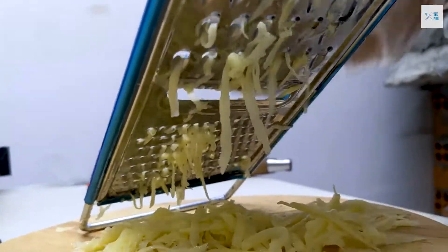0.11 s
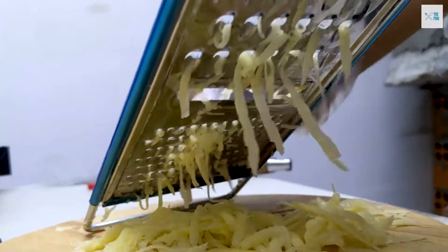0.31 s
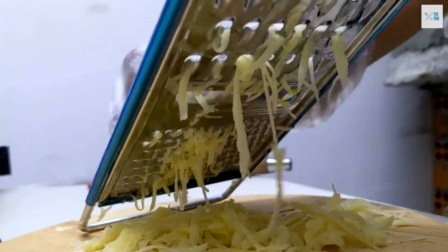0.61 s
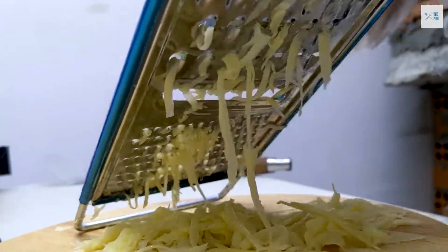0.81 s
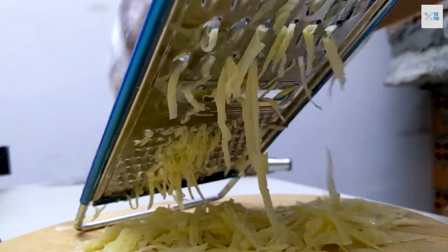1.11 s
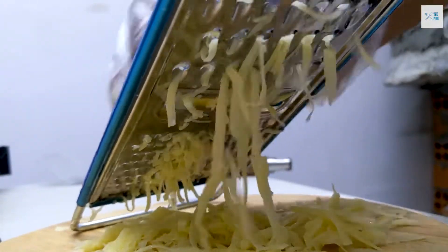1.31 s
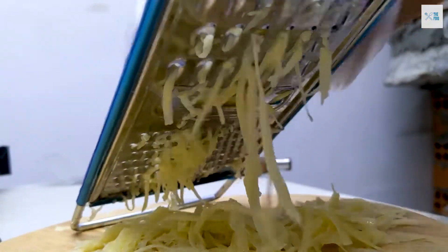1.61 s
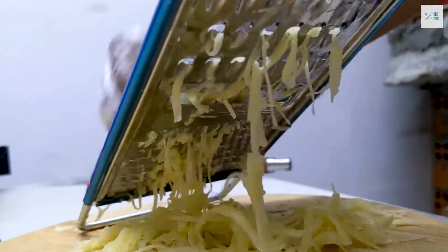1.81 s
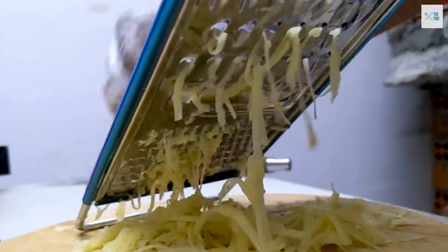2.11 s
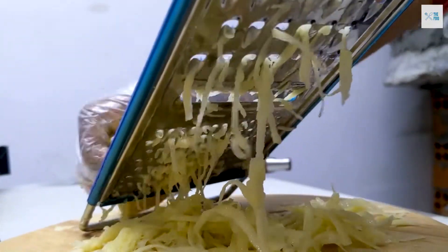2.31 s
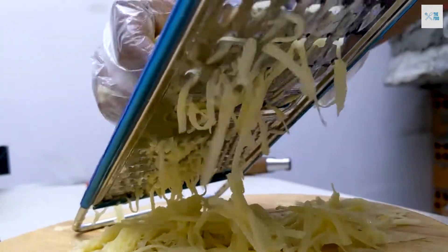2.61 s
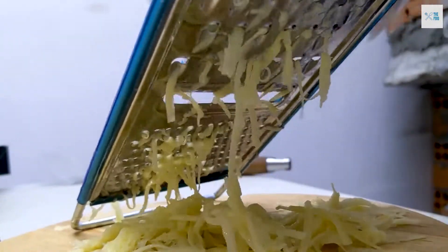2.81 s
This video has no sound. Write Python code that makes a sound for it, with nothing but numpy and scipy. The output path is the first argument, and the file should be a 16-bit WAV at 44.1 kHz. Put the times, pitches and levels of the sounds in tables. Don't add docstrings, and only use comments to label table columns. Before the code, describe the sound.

Raw potato grating, close in stereo in a quiet small kitchen. Faint scuff and steel rattle at 0 s, a steely drag at 0.2, a strong low board knock with rattle at 0.4. Wet, crunchy hissing strokes follow at about 0.6, 0.95, 1.3, 1.7 (loudest), 2.0, 2.3 and 2.6, shorter towards the end, with soft brushes between. Another heavy knock left at 2.13; light slides finish.

```python
import sys
import numpy as np
from scipy import signal
from scipy.fft import rfft, irfft, next_fast_len
from scipy.io import wavfile
from scipy.ndimage import uniform_filter1d, map_coordinates

SR = 44100
rng = np.random.default_rng(int(sys.argv[2]) if len(sys.argv) > 2 else 0)


def persist_wave(psi):
    counts = np.round(np.clip(psi, -1, 1) * 32767).astype(np.int16)
    wavfile.write(sys.argv[1], SR, np.atleast_2d(counts).T)


def amplitude_ratio(level_db):
    exponent = np.asarray(level_db, float) / 20
    return 10 ** exponent


N = 130095

# centre in Hz, width in Hz, level in dB.
STEEL_MODES = [(1630, 110, 3.5), (2180, 290, -3.5), (2852, 47, 6), (4080, 190, -17), (5240, 93, -5)]


def unit(x):
    return x / np.sqrt(np.mean(x ** 2) + 1e-20)


def along(points, hz):
    f, v = np.transpose(points)
    return np.interp(np.log(hz + 1), np.log(f + 1), v)


def shade(points):
    return lambda hz: amplitude_ratio(along(points, hz)) * (hz > points[0][0] / 2)


def peaks(modes, hz):
    total = 0
    for k, (centre, width, db) in enumerate(modes):
        damping = 1j * hz * width
        total = total + (-1) ** k * amplitude_ratio(db) * damping / (centre * centre - hz * hz + damping)
    return total


def wobble(rate):
    knots = rng.standard_normal(N // 40)
    return map_coordinates(knots, [np.arange(N) * np.clip(rate, 1, 1000) / SR])


def filtered(x, response):
    m = next_fast_len(N + SR // 2)
    return irfft(rfft(x, m) * response(np.fft.rfftfreq(m, 1 / SR)), m)[..., :N]


def rush(gain, patchy_db):
    # frequency in Hz, left-right correlation from 0 to 1.
    likeness = [(60, 0.43), (130, 0.98), (300, 0.96), (640, 0.71), (1400, 0.45), (3100, 0.065),
                (15000, .02)]
    z = signal.stft(rng.standard_normal((2, N)), nperseg=256)[2]
    field = uniform_filter1d(rng.standard_normal(z.shape[1:]), size=5, axis=0)
    field = uniform_filter1d(field, size=8, axis=1)
    pair = signal.istft(z * amplitude_ratio(patchy_db * unit(field)), nperseg=256)[1][:, :N]

    def mid_side(hz):
        turn = np.arccos(np.clip(along(likeness, hz), -1, 1)) / 2
        return gain(hz) * [np.cos(turn), np.sin(turn)]

    mid, side = filtered(pair, mid_side)
    return unit(np.array([mid + side, mid - side]))


def add(track, s, piece):
    i = max(round(s * SR), 0)
    track[i:i + len(piece)] += piece[:len(track) - i]


def floor():
    # frequency in Hz, level in dB per Hz.
    colour = [(30, -22), (90, -4.5), (180, -2), (600, -16.5), (1300, -24.5), (4000, -28.5), (15000, -35.5)]
    return amplitude_ratio(-45 + 3.4 * wobble(8.61)) * rush(shade(colour), patchy_db=-3.5)


def room(x):
    # frequency in Hz, time to fall 60 dB in seconds.
    decay = [(200, 0.11), (2000, 0.46), (12000, 0.043)]
    hz, t, z = signal.stft(rng.standard_normal((2, SR // 3)), SR, nperseg=256)
    tail = signal.istft(z * amplitude_ratio(-60 * t / along(decay, hz)[:, None]), SR, nperseg=256)[1]
    return signal.fftconvolve(x, tail / np.linalg.norm(tail[0]), axes=1)[:, :N]


def pressure(rows, bite, swell, fade, column=0, lag=0):
    t, out = np.arange(N) / SR, np.zeros(N)
    for row in rows:
        start, length, hiss_db = row[:3]
        layer_db = row[column] if column else 0
        u = np.maximum(t - start, 0)
        rise = (1 - np.exp(-u / bite)) * (1 - np.exp(-u / (swell + lag)))
        lifted = np.maximum(u - length - lag / 2, 0) / fade
        out += rise * amplitude_ratio(hiss_db + layer_db - 20 * lifted ** 1.21)
    return out


def contact(column=0, lag=0):
    # start in seconds, push length in seconds, hiss in dB,
    # body in dB over the hiss, steel in dB over the hiss.
    cuts = [
        (.608, 0.1, -25, -8.5, -11.5),
        (.958, .1, -24, -8, -14),
        (1.331, .15, -25.5, -11.5, -14),
        (1.698, 0.093, -22, -10.5, -14.5),
        (2.022, .08, -24.5, -6.5, -8.5),
        (2.323, 0.076, -24, -8, -9.5),
        (2.63, 0.051, -24.5, -10.5, -13.5),
    ]
    # start in seconds, length in seconds, hiss in dB,
    # body in dB over the hiss, steel in dB over the hiss.
    slides = [(0, 0.023, -45.5, 5.5, 6.5), (.095, 0.021, -54.5, -13, -3), (.39, 0.062, -60, 17.5, 7),
              (.515, 0.035, -48.5, 10, -1.5), (.73, 0.034, -44, 2, -2), (.822, .05, -36, -6.5, -14),
              (.88, 0.041, -40, -3, -6), (1.09, 0.052, -45, -5.5, -6), (1.15, 0.028, -49.5, -2, -8),
              (1.23, 0.027, -50, -7, -11), (1.266, 0.033, -43, -4.5, -10), (1.54, 0.056, -56.5, 5.5, 0),
              (1.9, 0.068, -57.5, 5, -14.5), (1.66, 0.026, -45, -0.5, -6.5), (1.85, 0.057, -56, -6, -6),
              (1.96, 0.025, -46, 6, -8), (2.15, 0.034, -51, 8.5, -11), (2.245, 0.024, -44.5, 4.5, -9.5),
              (2.47, 0.059, -51.5, 4, -1.5), (2.55, 0.037, -45, 5.5, -2.5), (2.795, 0.089, -49, -4.5, -5),
              (2.9, 0.066, -41, -2.5, -13)]
    # start in seconds, length in seconds, hiss in dB,
    # body in dB over the hiss, steel in dB over the hiss.
    catches = [
        (.066, .01, -48, -4, 3),
        (.222, 0.15, -26.5, -8.5, 0),
        (.857, 0.0058, -34, -7, -21),
        (1.193, 0.021, -37, -16, -13),
        (1.607, 0.013, -29, -6, -25),
        (2.526, 0.015, -30.5, 0.5, -8.5),
        (2.59, 0.0062, -40.5, -19, -12),
    ]
    return (pressure(cuts, 0.012, 0.018, 0.047, column, lag)
            + pressure(slides, 0.002, 0.008, 0.033, column, lag)
            + pressure(catches, 0.00093, 0.0089, 0.017, column, lag / 2))


def judders(low, t):
    # centre in seconds, peak in dB, pitch in Hz, width in seconds.
    thuds = [(0.012, -24.5, 145, 0.0083), (0.242, -17.5, 131, 0.013), (0.259, -14.5, 136, 0.0079),
             (0.297, -16, 174, 0.012), (0.354, -14.0, 144, 0.015), (0.374, -10, 201, 0.0023),
             (0.39, -2.5, 157.8, 0.011), (0.41, -15.5, 180, 0.0075), (0.538, -18.5, 133, 0.009),
             (0.685, -20.5, 138.0, 0.032), (0.709, -19.5, 132, 0.011), (0.93, -29.0, 170, 0.016),
             (1.036, -15.5, 168, 0.011), (1.056, -16, 163.0, 0.0084), (1.084, -23, 149, 0.021),
             (1.3, -29, 155.0, 0.012), (1.425, -24.5, 129, 0.024), (1.491, -22, 138, 0.024),
             (1.645, -21.5, 125, 0.04), (1.688, -20.5, 149, 0.0096), (1.808, -14.0, 146.7, 0.017),
             (1.979, -33.5, 182, 0.014), (2.1, -11.5, 152, 0.009), (2.118, -12.5, 199, 0.0061),
             (2.133, -2.5, 163.5, 0.0099), (2.27, -20.5, 146, 0.014), (2.413, -17, 142, 0.025)]
    ring_db, ring_t60_s = -4.5, 0.099
    for s, db, hz, width in thuds:
        burst = np.exp(-abs(t / (0.62 * width)) ** 3.44)
        ring = amplitude_ratio(ring_db - 60 * abs(t) / ring_t60_s) * (1 - np.exp(-np.maximum(t, 0) / width))
        add(low, s, amplitude_ratio(db - 2.1) * (burst + ring) * np.sin(2 * np.pi * hz * t))


def table_booms(low, t):
    # centre in seconds, level in dB.
    booms = [
        (0.018, -30.5),
        (0.244, -36.5),
        (0.404, -22),
        (.72, -38),
        (1.09, -37),
        (1.5, -36),
        (2.15, -21),
        (2.28, -36),
        (2.4, -37),
    ]
    for s, db in booms:
        add(low, s, amplitude_ratio(db) * np.exp(-(t / 0.029) ** 2) * np.sin(2 * np.pi * 63 * t))


def rumble():
    # frequency in Hz, level in dB per Hz.
    colour = [(30, -20), (60, -23), (90, -18.5), (125, -3.5), (190, 4.5), (240, -4.5), (400, -29)]
    shake = contact(column=3, lag=0.049) * unit(amplitude_ratio(2.4 * wobble(40)))
    return amplitude_ratio(6.5) * shake * rush(shade(colour), patchy_db=-1.0)


def board():
    low = np.zeros(N + SR)
    t = np.arange(-SR // 10, SR // 5) / SR
    judders(low, t)
    table_booms(low, t)
    left_db = 7.5
    return (low[SR // 10:][:N] + rumble()) * amplitude_ratio([[left_db / 2 - .7], [-left_db / 2 - .7]])


def rattle():
    # start in seconds, peak in dB.
    chatters = [(0.0246, -27), (0.1256, -51), (0.1994, -45), (0.4015, -23), (0.4394, -22.5),
                (0.5232, -38.5), (0.5514, -36.5), (1.0964, -26.5), (1.326, -35), (2.1704, -28.5),
                (2.2238, -33), (2.2405, -35.5), (2.262, -36), (2.2844, -35)]
    out, t = np.zeros((2, N)), np.arange(SR // 20) / SR
    for s, db in chatters:
        for ear in out:
            add(ear, s, amplitude_ratio(db - 20 * t / 0.011) * rng.standard_normal(len(t)))
    return filtered(out, lambda hz: 4 * peaks(STEEL_MODES, hz) + 0.071)


def juice_clicks():
    # start in seconds, peak in dB, pitch in Hz.
    ticks = [
        (.886, -30, 6340),
        (1.936, -39, 4600),
        (1.966, -28.5, 4430),
        (2.245, -31, 4260),
        (2.457, -32, 12700),
    ]
    out, t = np.zeros((2, N)), np.arange(SR // 20) / SR
    for s, db, hz in ticks:
        envelope = amplitude_ratio(db - 60 * t / 0.015) * (1 - np.exp(-t / 0.00035))
        for ear in out:
            add(ear, s, envelope * (np.sin(2 * np.pi * hz * t) + 0.99 * rng.standard_normal(len(t))))
    return out


def steel_scrape():
    # frequency in Hz, level in dB per Hz.
    colour = [(700, -5), (1500, -10), (2200, -3), (3100, -1), (5300, -4.5), (8000, -9), (12000, -44)]
    force = contact(column=4) * unit(amplitude_ratio(1.2 * wobble(150)))
    gain = lambda hz: shade(colour)(hz) * (1 + 0.36 * abs(peaks(STEEL_MODES, hz)))
    return force * rush(gain, patchy_db=0.0) * amplitude_ratio([[1.3], [-1.3]])


def potato_body():
    # frequency in Hz, level in dB per Hz.
    colour = [(150, -39), (260, -2), (520, -1), (900, -2.5), (1200, -4), (1800, -26)]
    # centre in Hz, width in Hz, level in dB.
    frame = [(305, 41, 1.5), (520, 27, 3), (800, 43, -6)]
    force = contact(column=3, lag=0.019) * unit(amplitude_ratio(1.7 * wobble(70)))
    gain = lambda hz: shade(colour)(hz) * (1 + 1.9 * abs(peaks(frame, hz)))
    return force * rush(gain, patchy_db=2.5) * amplitude_ratio([[.8], [-.8]])


def wet_hiss():
    # frequency in Hz, level in dB per Hz.
    colour = [(900, -18), (1500, -11.5), (3000, -7.5), (5900, -3), (7700, -2), (10000, -2), (14000, -2.5),
              (16000, -8)]
    # centre in Hz, width in Hz, level in dB.
    teeth = [(6320, 77, -4), (7620, 170, 1), (10000, 190, -11), (13500, 170, -7)]
    crunch = unit(amplitude_ratio(2 * wobble(900) + 0.4 * wobble(60)))
    gain = lambda hz: shade(colour)(hz) * (1 + amplitude_ratio(-7) * abs(peaks(teeth, hz)))
    return contact() * crunch * rush(gain, patchy_db=2.5)


def scene():
    grating = wet_hiss() + potato_body() + steel_scrape()
    near = grating * amplitude_ratio(4) + rattle() + juice_clicks()
    return near + amplitude_ratio(-14.5) * room(near) + board() + floor()


def top_cut(x):
    return signal.sosfilt(signal.butter(12, 16680, fs=SR, output="sos"), x)


def record(dry):
    mix = filtered(dry, lambda hz: hz < 15900)
    return top_cut(mix)


dry = scene()
out = record(dry)
persist_wave(out)
```